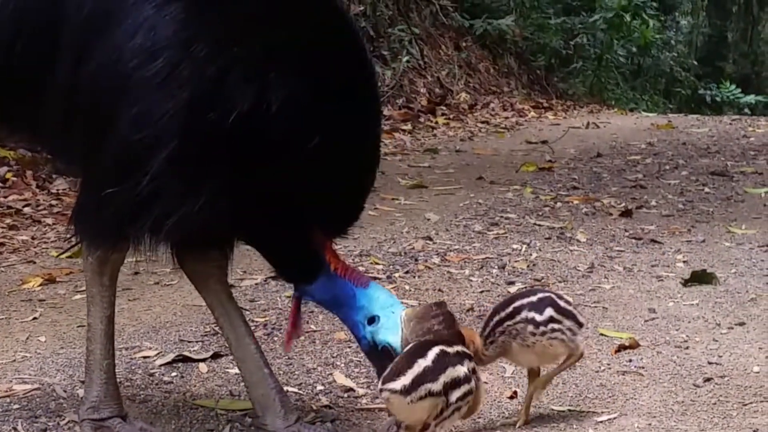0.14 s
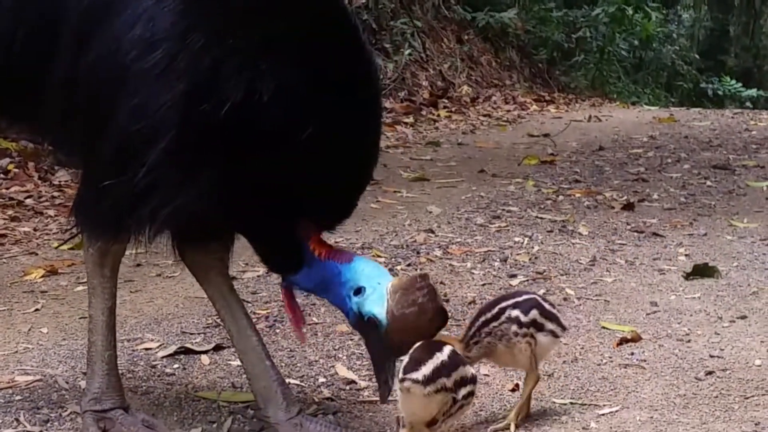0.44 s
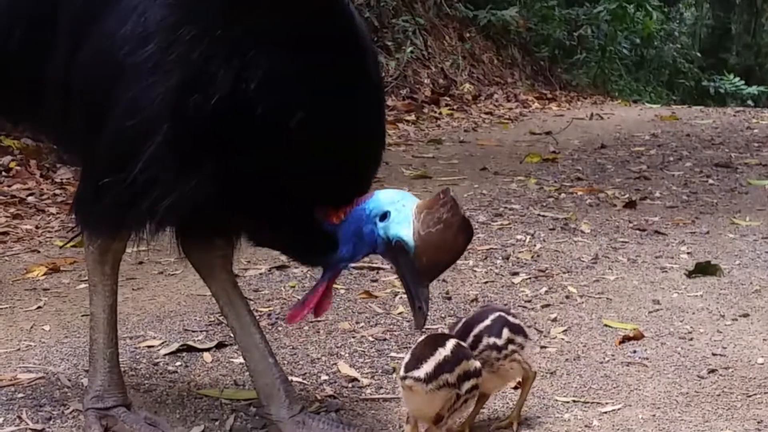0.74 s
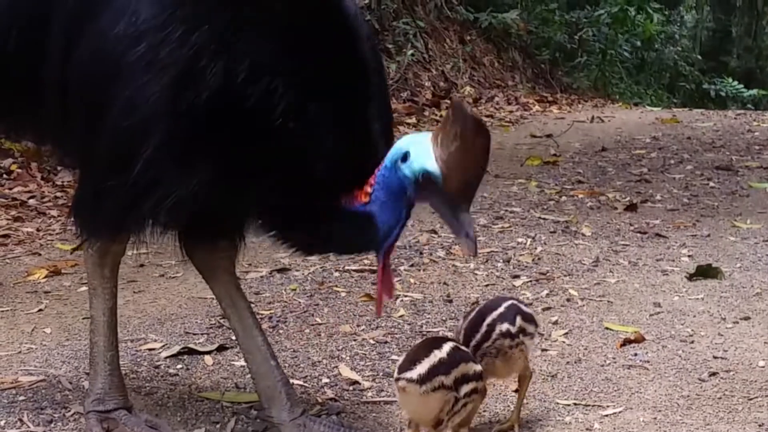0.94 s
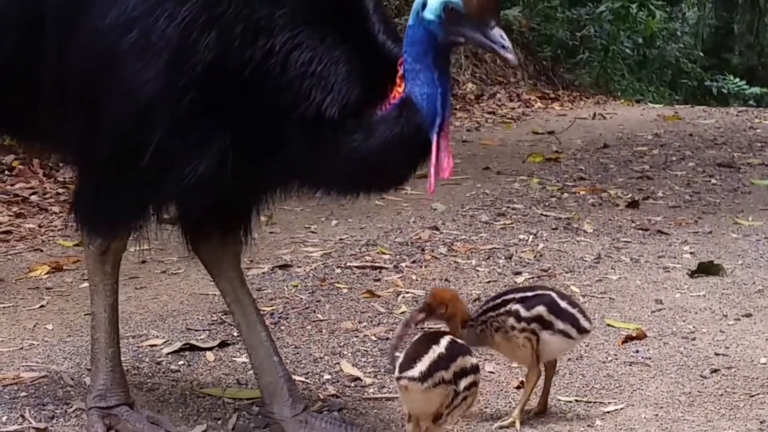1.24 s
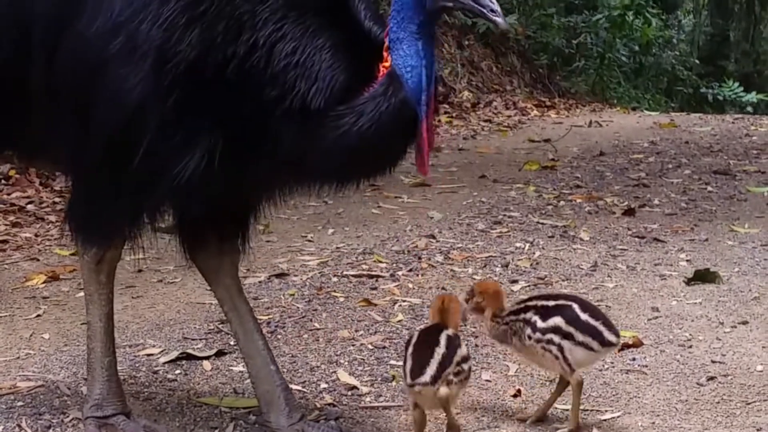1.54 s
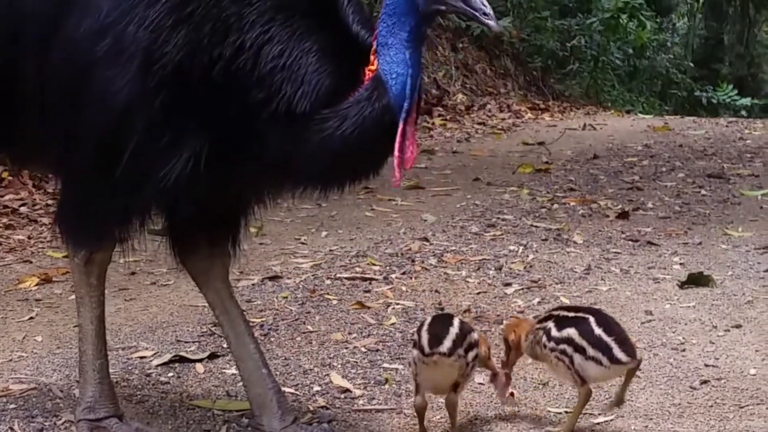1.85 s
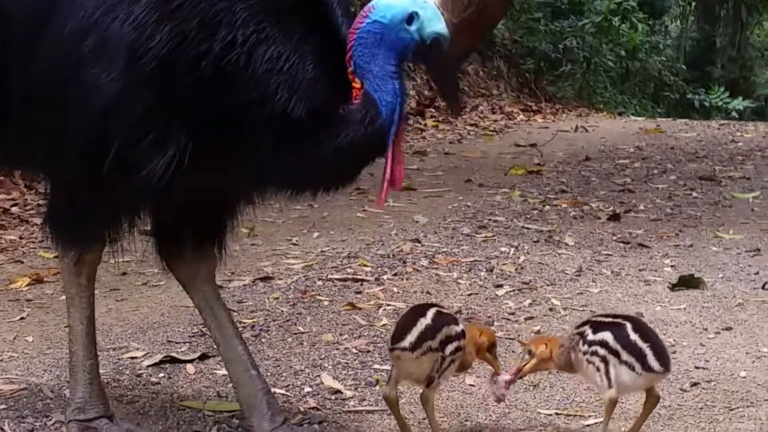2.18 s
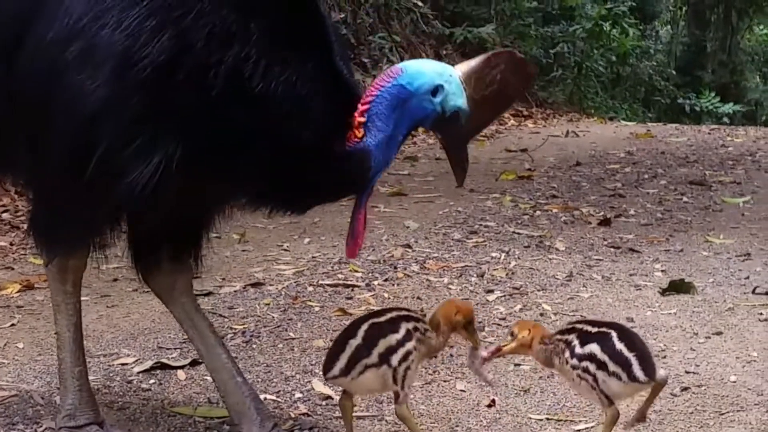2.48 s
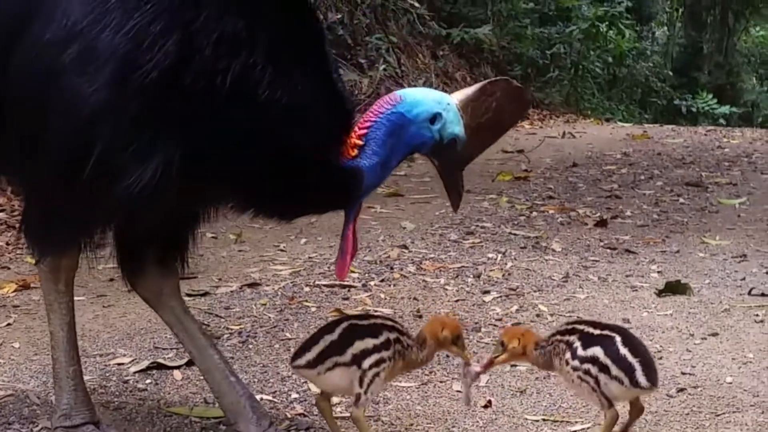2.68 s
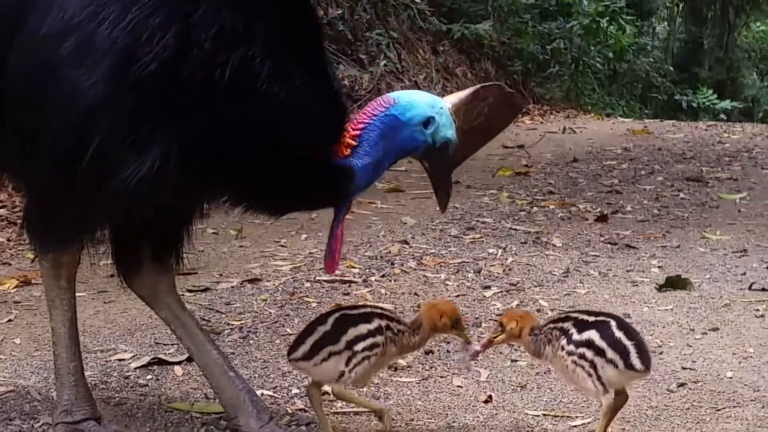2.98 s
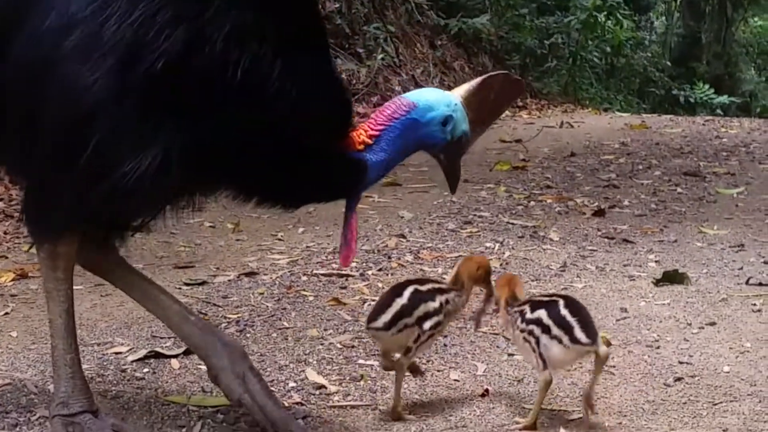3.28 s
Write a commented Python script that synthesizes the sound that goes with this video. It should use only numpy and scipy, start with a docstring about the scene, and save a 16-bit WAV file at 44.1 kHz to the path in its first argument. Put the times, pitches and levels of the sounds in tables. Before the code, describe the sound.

Continuous high insect buzzing in an open forest clearing, low irregular wind thumps at the microphone, a quick faint whistle near the start, then a barely audible low hoot and tiny ground ticks.

```python
"""A far insect chorus fills the forest first, louder on the left: random clicks and rhythmic singers ring
resonances into steady bands, and a higher band swells. Wind buffets the two microphone ports separately, as
lumpy low noise and single puffs. Towards the right a bird gives one arched whistle, a gliding sine with echo.
A short low sine and a few ticks of noise are faint and near the ground; shaped noise murmurs underneath."""
import sys
import numpy as np
from scipy import signal
from scipy.fft import rfft, irfft, next_fast_len
from scipy.io import wavfile
from scipy.ndimage import map_coordinates

SR = 44100
rng = np.random.default_rng(int(sys.argv[2]) if len(sys.argv) > 2 else 0)


def wrap_up_sound(samples):
    """Save the sound to the file named by the first command line argument, as 16-bit audio."""
    columns = np.atleast_2d(samples).T
    # keep every value between -1 and 1, then stretch to whole-number steps
    tamed = np.clip(columns, -1, 1)
    steps = np.round(tamed * 32767).astype(np.int16)
    wavfile.write(sys.argv[1], SR, steps)


def linear_from_db(decibels):
    """Turn decibels (scalar or array-like) into linear amplitude factors; 0 gives 1."""
    return 10 ** (np.asarray(decibels, float) / 20)


N = 150822

# resonances of the far singers: [pitch_hz, width_hz, left_db_per_hz, right_db_per_hz]
SINGER_BANDS = [(3470, 520, -86.5, -100.5), (3740, 340, -84.0, -92.0), (3930, 190, -80.5, -84.0),
                (4080, 110, -75.0, -81.5), (4280, 190, -76.0, -84.5), (4630, 200, -77.5, -86.0),
                (4790, 100, -74.0, -81.0), (4900, 170, -75.0, -86.0), (5140, 160, -78.0, -86.0),
                (5320, 170, -74.0, -82.0), (5570, 140, -77.0, -87.0), (5810, 150, -86.0, -103.0),
                (6430, 710, -89.0, -105.0), (6800, 470, -89.5, -104.0), (7130, 220, -82.0, -99.0),
                (7360, 270, -88.5, -104.0), (7820, 430, -98.0, -113.5)]
# resonances of the higher singers: [pitch_hz, width_hz, left_db_per_hz, right_db_per_hz]
HIGH_SINGER_BANDS = [(9930, 1050, -107, -106), (10680, 780, -104, -104), (11580, 1100, -105, -108)]
# swell of the higher singers, about its own mean: [time_s, level_db]
HIGH_SWELL_CURVE = [(0, -0.83), (.6, -1), (.8, 0.41), (1.5, 0), (1.69, 2.2), (1.85, -.5), (2.0, 1.3),
                    (2.3, -0.33), (3.0, 0.4), (3.1, -2), (3.42, -1)]
# wind strength at each microphone port: [time_s, left_db, right_db]
WIND_STRENGTH = [(0, -37, -36), (.15, -34, -38.5), (.3, -34, -40.5), (.4, -37.5, -34.5), (.5, -42, -38.5),
                 (.7, -49, -41.5), (.85, -46, -40.5), (1, -46, -34.5), (1.1, -38.5, -39), (1.2, -44.5, -32),
                 (1.32, -43, -31), (1.4, -36, -31.5), (1.53, -36, -33.5), (1.6, -44.5, -37.5),
                 (1.72, -46, -36), (1.8, -41, -31), (1.95, -38.5, -36.5), (2.1, -40, -38.5),
                 (2.25, -45, -39.5), (2.5, -43.5, -38.5), (2.6, -48, -41), (2.75, -44, -40.5),
                 (2.9, -46, -45), (3.1, -46, -44.5), (3.17, -42.5, -37), (3.28, -50.5, -39),
                 (3.33, -38, -44), (3.42, -46, -38)]
# colour of the low buffeting, relative within each port: [frequency_hz, left_db, right_db]
RUMBLE_COLOUR = [(11.8, -24, -30), (24.8, -16, -22), (50, -7.5, -1.5), (75, -3.5, -0.5), (110, -4.5, -2.5),
                 (154.6, -16, -6.5), (202.6, -25, -13.5), (294, -49, -34.5), (594, -101, -75)]
# colour of the buffeting's upper edge, relative within each port: [frequency_hz, left_db, right_db]
FLAP_COLOUR = [(80, -1, -32.5), (142.4, 10, -0.5), (230, -35, -4.5), (335, -35, -11.5), (415, -34, -20.5),
               (620, -58, -30), (1000, -90, -80)]
# single puffs, levels at half the envelope's peak amplitude: [centre_s, left_db, right_db, pitch_hz]
WIND_PUFFS = [(0.046, -33.5, -64, 60), (.345, -23.5, -33.5, 69), (0.366, -28.5, -46, 75),
              (.545, -39, -52, 59.5), (0.784, -36.5, -63, 70), (1.059, -34, -64, 75), (1.17, -60, -32, 75),
              (1.219, -30, -60, 70), (1.386, -29.5, -60, 80), (1.425, -50, -24, 100),
              (1.455, -28, -67.5, 91), (1.466, -57, -26, 123), (1.519, -38, -65, 86),
              (1.774, -36, -63.5, 80), (1.812, -32, -61, 80), (1.862, -60, -33, 94),
              (1.915, -33, -58.5, 55.3), (1.94, -55, -29.5, 110), (2.0, -33, -62.5, 75),
              (2.031, -56, -39, 71), (2.399, -31, -64, 75), (2.491, -50, -62, 55), (2.667, -33, -51, 70),
              (3.15, -57, -32.5, 70), (3.218, -62, -32.5, 80), (3.309, -45, -64, 50), (3.375, -36, -57, 60)]
# the bird's whistle, rms level before panning: [time_s, pitch_hz, level_db]
WHISTLE_PATH = [(.352, 1400, -66.5), (.36, 1470, -60), (.367, 1550, -55.5), (.374, 1730, -67),
                (.385, 1880, -62), (.4, 2075, -68), (.412, 2206, -67), (.42, 2170, -80), (.43, 2260, -74),
                (.438, 2280, -66), (.446, 2030, -64), (.457, 1630, -62), (.465, 1530, -61),
                (.474, 1420, -76)]
# ticks near the ground, starting noise level before the band filter: [start_s, level_db, pitch_hz]
GROUND_TICKS = [(.934, -38, 1000), (1.8811, -59, 11000), (1.941, -57, 11000), (3.2934, -60, 11000)]
# spectrum of the forest murmur: [frequency_hz, left_db_per_hz, right_db_per_hz]
MURMUR_SPECTRUM = [(100, -86.5, -61), (231, -78.5, -80.5), (388, -85, -84.5), (610, -81.5, -84.5),
                   (1080, -89, -89), (1400, -95, -93.5), (2110, -97, -98), (2360, -100, -93.5),
                   (2960, -95.5, -100), (6000, -106, -108.5), (8900, -115, -115), (13500, -113, -113),
                   (15700, -111, -111)]
# left-right correlation of the murmur: [frequency_hz, correlation_0_to_1]
MURMUR_LIKENESS = [(250, .3), (500, .48), (800, .35), (1200, .42), (1500, .12), (3000, 0)]

CLICKS_PER_S, RHYTHM_DRIFT = 190, .004  # a rhythmic singer's mean rate; its drift as a fraction of that rate
CROWD_PER_S, CLICK_SCATTER_DB = 6000, 5  # the crowd's mean click rate; spread of click sizes
NEAR_DB = -8.5  # rhythmic singer against the crowd
SWELL_DB, FLUTTER_DB = 0.4, 0.65  # slow and quick level drift of each resonance
TREES_T60_S = 0.55
FLAP_DB = [-16, -4.5]  # left, right: against the rumble when the wind is strongest
FLAP_GROWS = 1.91  # dB of flap for each dB of wind strength
LUMPS_DB = [3, 1]  # left, right: spread of the lumps
PUFF_CYCLES = 0.45  # Gaussian spread of a puff, in cycles of its pitch
WHISTLE_PAN_DB, WHISTLE_ECHO_DB = 5, -8
HOOT_S, HOOT_LENGTH_S, HOOT_RISE_S = 1.64, .1, .015
HOOT_HZ, HOOT_DB = 240, [-54, -60]  # pitch; left and right level
TICK_T60_S = 0.0087
LAG_S = .00028  # the murmur reaches the right port later
TOP_HZ = 15750


def unit(x):
    """Scales each channel to an rms of one."""
    return x / np.sqrt(np.mean(x ** 2, axis=-1, keepdims=True) + 1e-20)


def along(points, hz):
    """Reads the columns after the frequency on a log axis."""
    f, *cols = np.transpose(points)
    return np.array([np.interp(np.log(hz + 1), np.log(f + 1), c) for c in cols])


def curves(rows):
    """Gives one value per sample for each column after the time."""
    s, *cols = np.transpose(rows)
    return np.array([np.interp(np.arange(N) / SR, s, c) for c in cols])


def wobble(rate):
    """Draws a smooth random curve for each channel, rate knots a second."""
    place = np.arange(N) * rate / SR
    knots = int(N * rate / SR) + 4
    return np.array([map_coordinates(rng.standard_normal(knots), [place]) for _ in "LR"])


def filtered(x, response):
    """Multiplies the spectrum of x by a complex response of frequency."""
    m = next_fast_len(x.shape[-1] + 8192)
    spectrum = rfft(x, m) * response(np.fft.rfftfreq(m, 1 / SR))
    return irfft(spectrum, m)[..., :x.shape[-1]]


def trees(x):
    """Scattering among trunks: a decaying noise tail, different at each port."""
    t = np.arange(SR // 2) / SR
    tail = rng.standard_normal((2, len(t))) * linear_from_db(-60 * t / TREES_T60_S)
    tail = tail / np.linalg.norm(tail, axis=1, keepdims=True)
    return signal.fftconvolve(np.atleast_2d(x), tail, axes=1)[:, :np.shape(x)[-1]]


def crowd_clicks():
    """Countless far singers: clicks of random time, sign and size, separate at each port."""
    chance, size = rng.random((2, N)), rng.standard_normal((2, N))
    sign = np.sign(chance - CROWD_PER_S / SR / 2)
    return unit((chance < CROWD_PER_S / SR) * sign * linear_from_db(CLICK_SCATTER_DB * size))


def rhythmic_singer():
    """One singer clicks at a slightly drifting rate, blurred by the trees."""
    lead = SR // 2  # lets the tree tail build up before the scene starts
    drift = np.pad(wobble(4)[0], (lead + 1, 0), "reflect")
    rate = CLICKS_PER_S * (rng.uniform(.9, 1.1) + RHYTHM_DRIFT * drift)
    beat = np.diff(np.floor(np.cumsum(rate) / SR))  # a click at each whole cycle
    return unit(trees(beat - beat.mean())[:, lead:])


def chorus(singers):
    """Crowd and rhythmic singer excite each resonance, a band-pass applied three times."""
    out = np.zeros((2, N))
    for hz, width, *level_db in singers:
        clicks = crowd_clicks() + linear_from_db(NEAR_DB) * rhythmic_singer()
        clicks = clicks / np.hypot(1, linear_from_db(NEAR_DB))
        drift = linear_from_db(SWELL_DB * wobble(1.5) + FLUTTER_DB * wobble(8.97))
        ring = lambda f: (2j * f * width / (hz * hz - f * f + 2j * f * width + 1e-9)) ** 3
        out += linear_from_db(level_db)[:, None] * filtered(drift * clicks, ring)
    return out * np.sqrt(SR / 2)  # levels are per Hz


def insects():
    """Adds the steady main chorus and the higher, swelling one."""
    swell_db, = curves(HIGH_SWELL_CURVE)
    swell = linear_from_db(swell_db - swell_db.mean())
    return chorus(SINGER_BANDS) + swell * chorus(HIGH_SINGER_BANDS)


def coloured_noise(colour):
    """Noise of unit rms, separate at each port, shaped by a colour table."""
    return unit(filtered(rng.standard_normal((2, N)), lambda f: linear_from_db(along(colour, f))))


def buffeting():
    """Turbulence on each port: a lumpy rumble whose upper edge rises with wind strength."""
    strength_db = curves(WIND_STRENGTH)
    lumps = linear_from_db(np.array(LUMPS_DB)[:, None] * wobble(14))
    below_peak_db = strength_db - strength_db.max(axis=1, keepdims=True)
    # the wind strength below supplies the other 1 dB per dB
    flap_db = np.array(FLAP_DB)[:, None] + (FLAP_GROWS - 1) * below_peak_db
    flap = linear_from_db(flap_db) * coloured_noise(FLAP_COLOUR)
    return linear_from_db(strength_db) * unit(lumps) * (coloured_noise(RUMBLE_COLOUR) + flap)


def puffs():
    """Single pressure pulses on the ports: short low cosines of random phase under a Gaussian."""
    out, t = np.zeros((2, N)), np.arange(N) / SR
    for s, left_db, right_db, hz in WIND_PUFFS:
        cycles = (t - s) * hz
        envelope = np.exp(-.5 * (cycles / PUFF_CYCLES) ** 2)
        pulse = envelope * np.cos(2 * np.pi * (cycles + rng.random()))
        out += 2 * linear_from_db([[left_db], [right_db]]) * pulse
    return out


def bird():
    """One arched whistle from the right, a gliding sine with its echo among the trees."""
    hz, db = curves(WHISTLE_PATH)
    t = np.arange(N) / SR
    sounding = (t > WHISTLE_PATH[0][0]) & (t < WHISTLE_PATH[-1][0])
    tone = np.sqrt(2) * linear_from_db(db) * sounding * np.sin(2 * np.pi * np.cumsum(hz) / SR)
    direct = tone * linear_from_db([[-WHISTLE_PAN_DB], [WHISTLE_PAN_DB / 2]])
    return direct + linear_from_db(WHISTLE_ECHO_DB) * trees(tone)


def hoot():
    """A short, faint low sine that rises quickly and fades."""
    t = np.arange(N) / SR - HOOT_S
    rise = np.clip(t / HOOT_RISE_S, 0, 1)
    fade = np.sqrt(np.clip(1 - t / HOOT_LENGTH_S, 0, 1))
    return np.sqrt(2) * linear_from_db(HOOT_DB)[:, None] * rise * fade * np.sin(2 * np.pi * HOOT_HZ * t)


def ticks():
    """Grit shifting: short decaying bursts of noise in a broad band round a pitch."""
    out, t = np.zeros((2, N + SR)), np.arange(1024) / SR
    for s, db, hz in GROUND_TICKS:
        burst = rng.standard_normal((2, len(t))) * linear_from_db(db - 60 * t / TICK_T60_S)
        band = lambda f: 1j * f * hz / (hz * hz - f * f + 1j * f * hz)
        start = round(s * SR)
        out[:, start:start + len(t)] += filtered(burst, band)
    return out[:, :N]


def murmur():
    """Leaves and far water: noise with a gentle level drift, partly shared by the ports."""
    shared, opposed = rng.standard_normal((2, N))
    # this split of shared and opposed noise gives the tabled correlation
    angle = lambda f: np.arccos(np.clip(along(MURMUR_LIKENESS, f), 0, 1)) / 2
    lag = lambda f: np.exp(np.pi * 1j * f * LAG_S * np.array([[1], [-1]]))
    colour = lambda f: linear_from_db(along(MURMUR_SPECTRUM, f)) * lag(f)
    same = filtered(shared, lambda f: colour(f) * np.cos(angle(f)))
    apart = filtered(opposed, lambda f: colour(f) * np.sin(angle(f))) * [[1], [-1]]
    return np.sqrt(SR / 2) * linear_from_db(1.3 * wobble(2.79)) * (same + apart)


def scene():
    """Sums the forest at the two ports, from the chorus down to the murmur."""
    return insects() + buffeting() + puffs() + bird() + hoot() + ticks() + murmur()


def band_limit(x):
    """A steep low-pass at the top of the band."""
    return signal.sosfilt(signal.butter(12, 16820, fs=SR, output="sos"), x)


def record(dry):
    """A low-pass removes everything from TOP_HZ up."""
    mix = filtered(dry, lambda hz: hz < TOP_HZ)
    return band_limit(mix)


dry = scene()
out = record(dry)
wrap_up_sound(out)
```